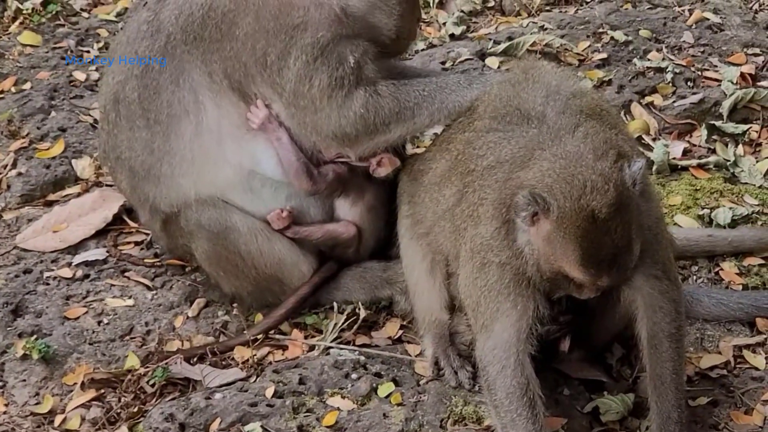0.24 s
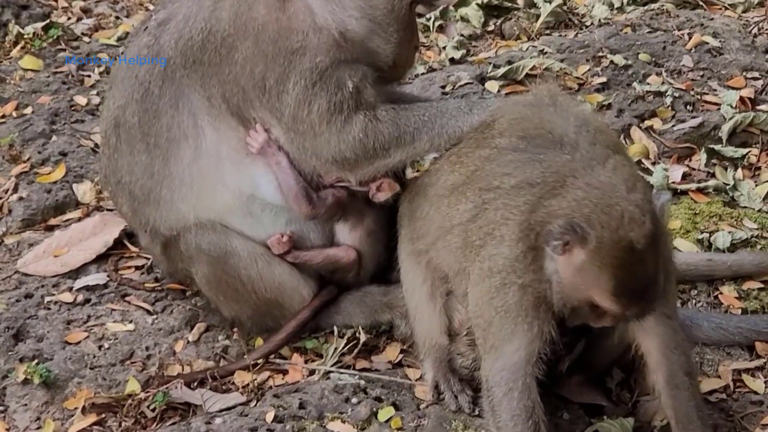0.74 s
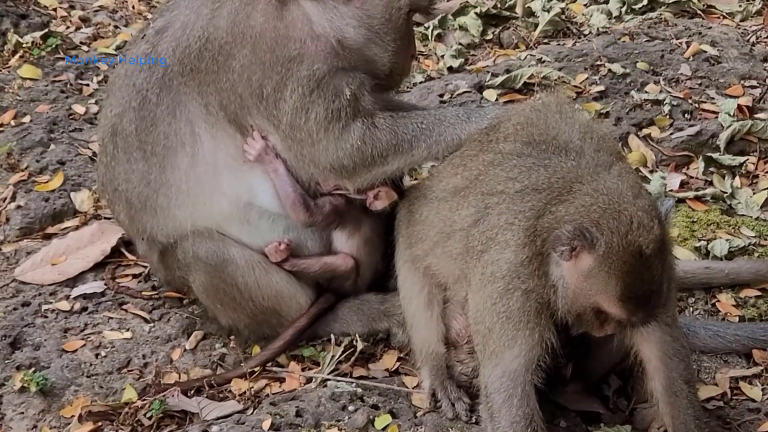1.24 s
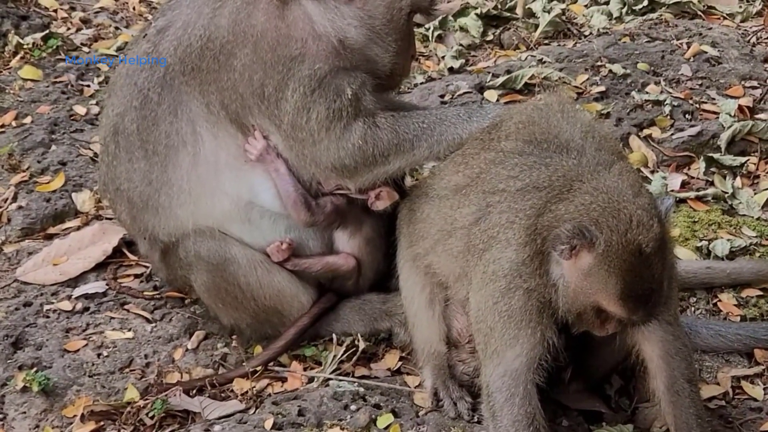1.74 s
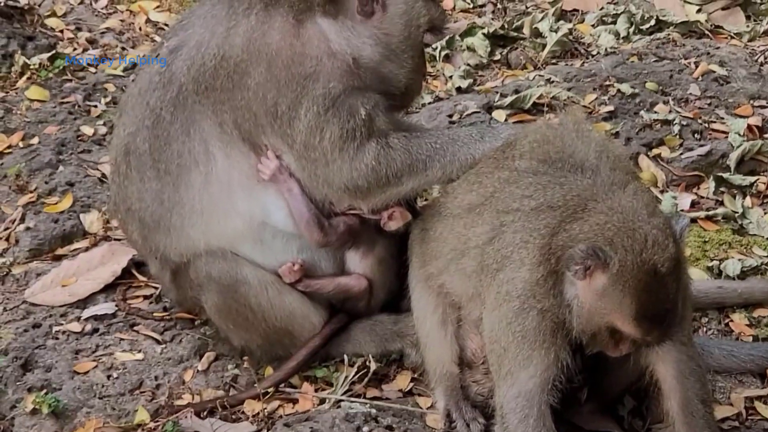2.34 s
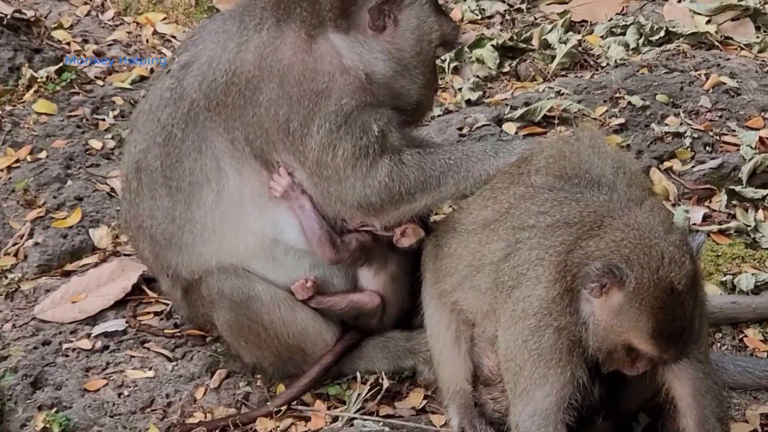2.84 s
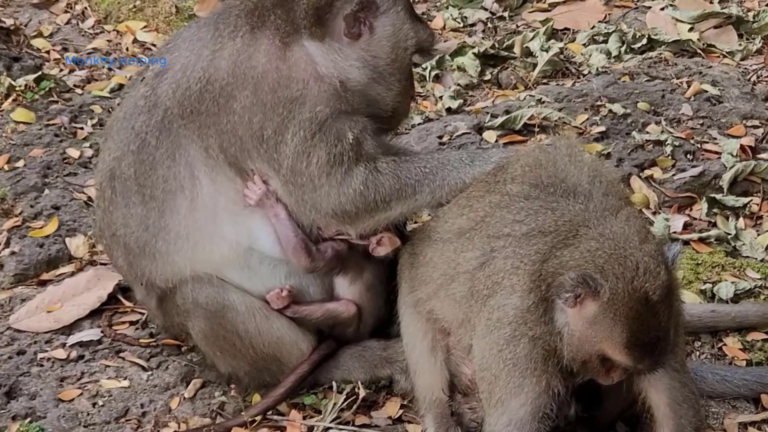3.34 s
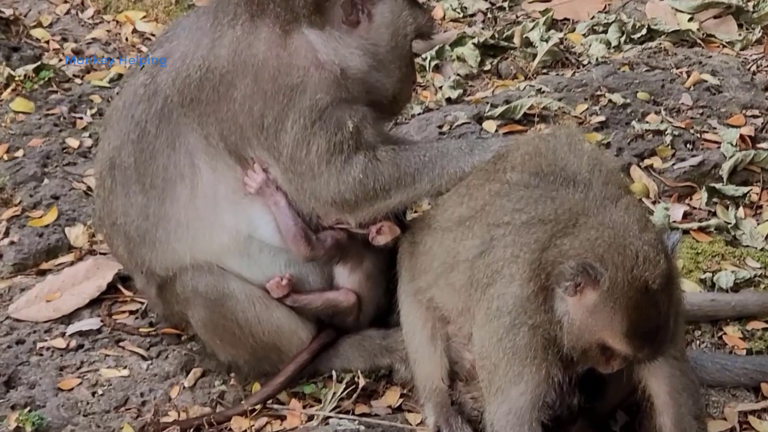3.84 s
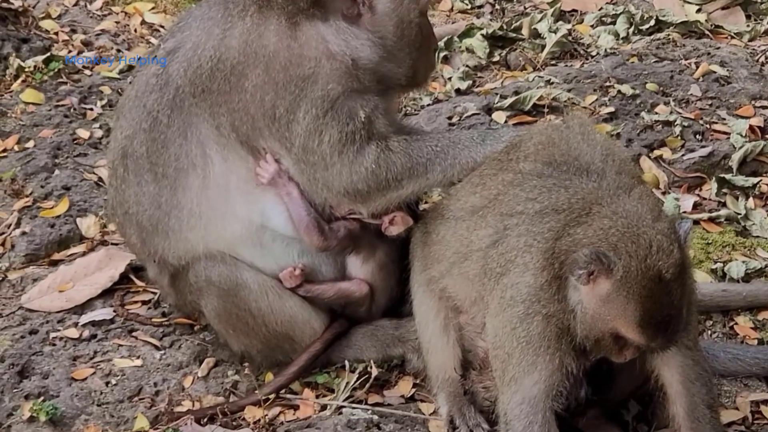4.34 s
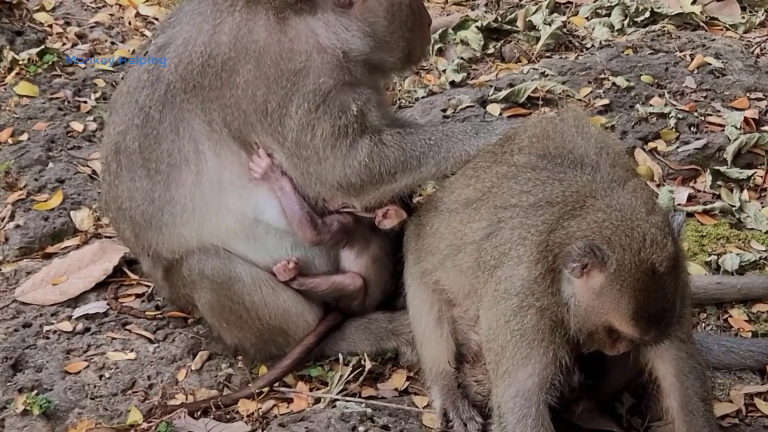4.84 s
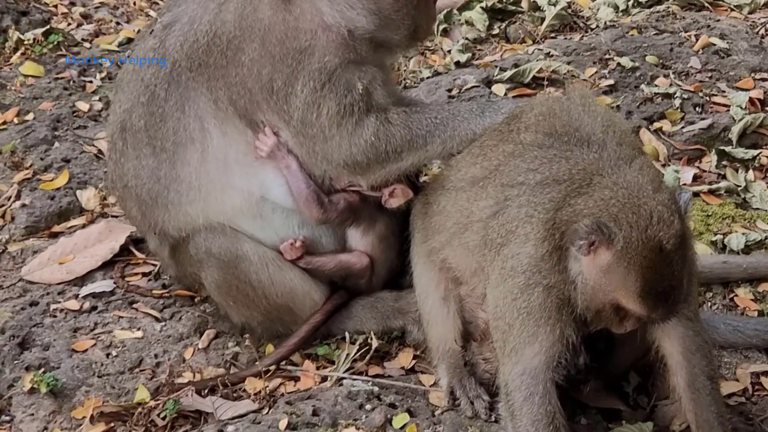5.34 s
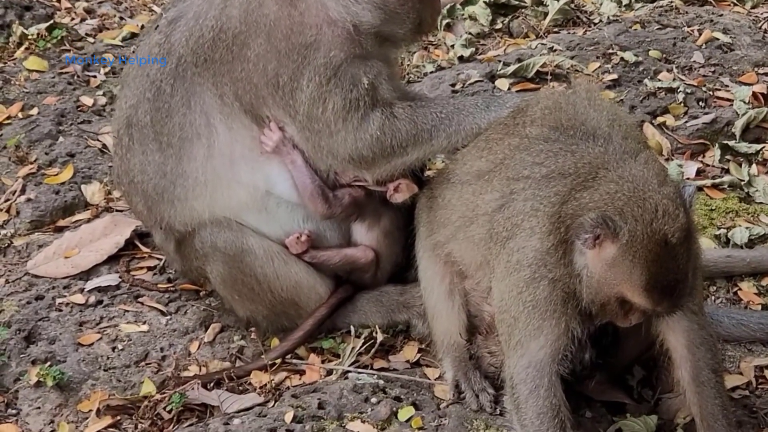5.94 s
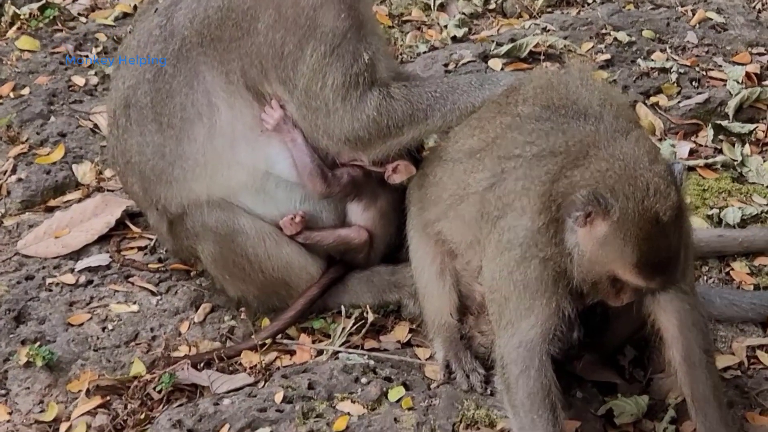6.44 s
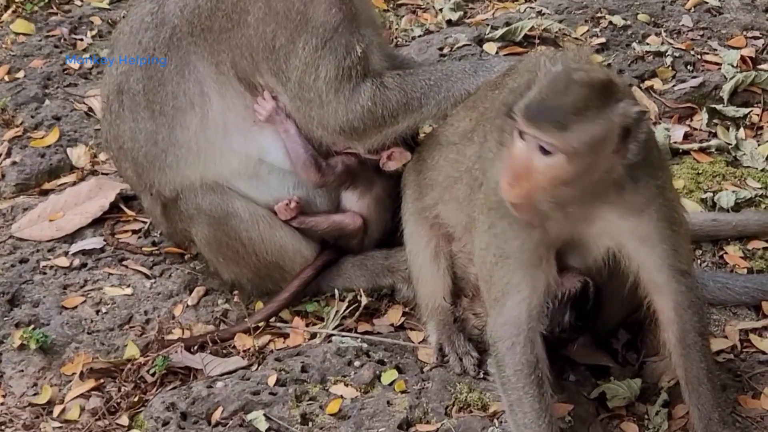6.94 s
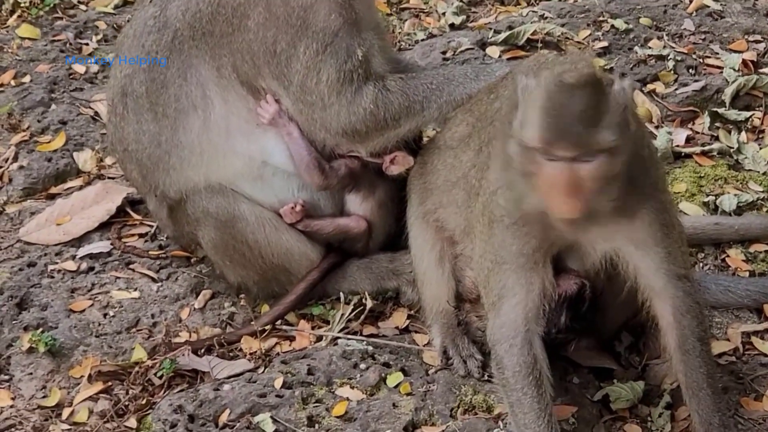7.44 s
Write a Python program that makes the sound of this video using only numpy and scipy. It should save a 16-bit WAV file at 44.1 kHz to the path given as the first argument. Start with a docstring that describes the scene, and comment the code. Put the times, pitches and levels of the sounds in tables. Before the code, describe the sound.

A low engine hum runs unchanged behind a quiet leafy place, with soft wind and hissing insects. One bright twig crack stands out early, after faint bird whistles. Near the middle come barely heard coos and a brief rough shriek from a nearby young monkey, brighter on the right, followed by tiny yelps and a dull paw thud. Later it gives a longer, purer squeal while a bird chirps, another twig snaps, and calm returns.

```python
"""Leaves rustle and a twig snaps over a distant engine's drone, with far traffic, wind and hissing insects.
Birds whistle and chirp, a far monkey coos, paws thud; a young monkey close by on the right shrieks, then squeals.
Calls are stacks of wavering sines mixed with rough breath; whistles, chirps and thuds are single sines.
Leaves, twigs, air and insects are filtered noise; trees scatter calls, snaps and birds back."""
import sys
import numpy as np
from scipy import signal
from scipy.fft import rfft, irfft, next_fast_len
from scipy.io import wavfile
from scipy.ndimage import uniform_filter1d

SR = 44100
rng = np.random.default_rng(int(sys.argv[2]) if len(sys.argv) > 2 else 0)


def materialize(psi):
    """Save the field psi as 16-bit PCM at rate SR to the path in sys.argv[1].

    A 1-D psi becomes a single channel; in a 2-D psi each row is a channel.
    """
    bounded = np.clip(np.atleast_2d(psi).T, -1, 1)
    quanta = np.round(bounded * 32767).astype(np.int16)
    wavfile.write(sys.argv[1], SR, quanta)


N = 339594  # length in samples

# distant engine, the firing tone and weaker tones around it: multiple of its pitch, level/dB
ENGINE_TONES = [(.5, -11.5), (0.749, -19), (1, 2.5), (1.251, -12.5), (1.499, -13), (1.75, -19)]
FIRING_HZ, ENGINE_DB = 69.46, -41.5
ENGINE_WANDER, ENGINE_FLUTTER_DB = .005, 1.3  # spread of pitch (as a share) and of level
# tone colour of far traffic and wind, before the overall level is set: f/Hz, level/dB per Hz
AIR_COLOUR = [(18, -36), (30, -9.5), (45, -8.5), (57, -6.5), (90, -6), (135, -10.5), (199, -21), (315, -24),
              (428, -30), (1790, -46.5), (5380, -41), (6110, -61), (6770, -47), (13500, -57)]
AIR_DB = -39
# how alike the air sounds at left and right: f/Hz, likeness (-1 to 1)
AIR_LIKENESS = [(60, 1), (130, 1), (290, 0.94), (640, 0.29), (1410, -0.61), (3100, -0.15), (6820, 0.12),
                (15000, -0.23)]
# bands of insect hiss: f/Hz, width/Hz, level/dB
INSECT_BANDS = [(6074, 580, -59), (2053, 2290, -54)]
# leaves stirring in short swells: t/s, peak level/dB, half length/s
LEAF_SWELLS = [(0.093, -52, 0.055), (0.183, -48.5, 0.037), (0.624, -54.5, 0.043), (1.493, -50.5, 0.09),
               (3.255, -54, 0.079), (4.727, -57, 0.16), (4.989, -56, 0.083), (6.6, -51.5, 0.06),
               (7.259, -53.5, 0.035), (7.559, -54.5, 0.039), (7.652, -51, 0.022)]
# paw thuds: t/s, starting level/dB, f/Hz
PAW_THUDS = [(0.201, -37.5, 1000), (4.136, -34.5, 460), (4.335, -22, 264), (4.428, -28.5, 460.6),
             (5.23, -31.5, 335)]
# twig snaps: t/s, crack level/dB, centre f/Hz, time to fall 60 dB/s, left minus right level/dB
TWIG_SNAPS = [(0.198, -44, 1800, .05, -2), (1.288, -55, 9100, 0.09, 0), (1.6736, -36, 3500, 0.0053, 2),
              (1.994, -51.5, 7830, .06, -10), (2.3405, -16.5, 7450, 0.093, -2.5),
              (3.031, -50, 6030, 0.18, -5), (3.093, -43.5, 7000, 0.059, -6),
              (3.201, -37.5, 4300, 0.031, -6.5), (3.359, -42, 2900, 0.038, -6),
              (4.801, -49.5, 6000, .07, -8), (5.198, -32, 6620, 0.1, -3), (5.994, -26, 5890, 0.096, -3.5)]
# what rings on after a snap: f/Hz, width/Hz, level/dB
TWIG_RING = [(2560, 740, -4), (6000, 1300, 4), (11050, 810, -2)]
BOUNCE_S, BOUNCE = 0.015, 0.089  # the broken end strikes once more: delay, strength
# far whistles: t/s, length/s, first f/Hz, last f/Hz, bow above the straight glide/Hz, level/dB
BIRD_WHISTLES = [(1.195, .105, 4000, 3400, -24, -63), (1.39, .085, 3600, 4000, -110, -60),
                 (1.55, .11, 3790, 3760, -20, -61.5), (1.69, .09, 3780, 4070, 40, -62),
                 (1.78, .1, 4070, 4040, 0, -67), (1.58, .09, 2040, 1960, 30, -61)]
WHISTLE_EDGE_S = 0.0091
# a bird's quick rising chirps: t/s, first f/Hz, last f/Hz, peak level/dB
BIRD_CHIRPS = [(2.17, 5150, 5510, -52), (5.405, 4900, 5070, -40), (5.51, 4800, 5200, -37),
               (5.604, 4650, 5500, -40.5), (5.68, 4700, 5500, -46.5), (5.721, 4750, 5460, -49)]
# soft coos of a far monkey: t/s, length/s, first f/Hz, last f/Hz, bow/Hz, level/dB before the throat
FAR_COOS = [(3.342, 0.13, 343.5, 430, -25.5, -50), (3.462, 0.15, 339, 365, 27.5, -51.5),
            (3.611, 0.12, 363, 340, 4, -53)]
# lift given by the cooing throat: f/Hz, level/dB
COO_THROAT_LIFT = [(1300, -14), (1800, 2), (2200, -16), (2600, -21), (3100, -5), (3700, -6.5), (4200, -26)]
TREES_DB = -5.5  # energy of the scattered sound against the direct one, for an even noise
MID_T60_S, WIDE_T60_S = 1.2, .26  # time to fall 60 dB: band near 2 kHz, all pitches
# lift given by the young monkey's throat: f/Hz, level/dB
THROAT_LIFT = [(3600, 0.5), (4600, -8), (5600, 9.5), (6800, 8), (7600, 11.5), (8300, -5), (9300, -1),
               (10300, 0.5), (12000, -15), (14000, -13), (15800, -68)]
# tone colour of its breath: f/Hz, level/dB
BREATH_COLOUR = [(1500, -4.5), (2700, -1), (3400, -19), (4300, -1.5), (5000, 3), (6000, -3), (7000, 6),
                 (8500, -8.5), (10000, 5), (12000, -0.5), (14000, -2.5), (15800, -14)]
STRAND_GAP_HZ, STRAND_DRIFT, HISS_DB = 550, .05, -4  # drift as a share of pitch
TOP_HZ = 15900  # nothing is wanted above this
# the calls, left minus right: f/Hz, level/dB
CALL_SHADOW = [(2000, 0), (4400, -1.5), (8000, -8.5), (15000, -4)]
# the hoarse shriek dips, then holds its pitch: t/s, f/Hz, fundamental level/dB, overtones and breath level/dB
SHRIEK_NOTE = [(3.758, 2870, -38, -53), (3.774, 2745, -26.5, -39), (3.796, 2558, -30, -35),
               (3.81, 2700, -25.5, -39), (3.841, 2690, -27.5, -43), (3.85, 2680, -53, -34),
               (3.884, 2700, -48, -40), (3.906, 2750, -26.5, -32.5), (3.931, 2677, -30.5, -50),
               (3.943, 2713, -48, -30), (3.962, 2767, -38.5, -25), (4.02, 2680, -51, -46.5),
               (4.054, 2710, -64, -35), (4.074, 2730, -65, -40)]
SHRIEK_ROUGH_START, SHRIEK_ROUGH_END, TEARS_S = .22, .96, .17  # breath takes over in this time
# a second, thinner tone climbs and falls away inside the shriek: same columns as the shriek
SPLIT_NOTE = [(3.948, 3710, -49, -49), (3.968, 3800, -43, -50), (3.984, 4540, -34.5, -38),
              (4.008, 4630, -40, -42), (4.054, 3450, -45, -56), (4.065, 3520, -56, -53)]
# the long clear squeal: same columns as the shriek
SQUEAL_NOTE = [(5.245, 1895, -47, -46), (5.266, 2107, -41, -38), (5.276, 2110, -35.5, -27),
               (5.293, 2193, -28, -24.5), (5.315, 2230, -36.5, -28.5), (5.361, 2244, -27.5, -25.5),
               (5.415, 2288, -32, -28.5), (5.45, 2345, -56, -25), (5.474, 2414, -30.5, -27),
               (5.512, 2330, -36, -30), (5.528, 2260, -30, -28.5), (5.565, 1936, -39, -31.5),
               (5.591, 1805, -55, -40.5)]
HOARSE, CLEAR, CRACKED = .35, .002, .65  # share of breath at the squeal's start, middle and end
CLEARS_S, CRACKS_S = .06, .05
# short yelps: t/s, hold/s, first f/Hz, last f/Hz, fundamental level/dB,
# overtones and breath level/dB, roughness (0 to 1)
SHORT_YELPS = [(3.664, 0.026, 1956, 2105, -29.5, -31.5, 0.01), (3.7, 0.0075, 2130, 2270, -28.5, -29, 0.04),
               (4.204, 0.034, 2750, 2737, -36, -37.5, 0.85), (4.206, 0.008, 3850, 5500, -39, -40, 0.5),
               (4.204, 0.0044, 4650, 5850, -41, -52, 0.67), (4.328, 0.016, 3740, 3540, -45, -46.5, 0.54),
               (4.374, 0.015, 3860, 3280, -47.5, -49, 0.14), (4.406, 0.016, 2900, 2450, -28.5, -31, 0.87),
               (5.156, 0.02, 1980, 1790, -36.5, -29, 0.09)]
YELP_ATTACK_S, YELP_RELEASE_S, YELP_RISE_DB, YELP_FALL_DB = 0.009, 0.0204, 17.5, 23


def undb(db):
    """Turn decibels into a plain multiplier."""
    return 10 ** (np.asarray(db) / 20)


def level(x, db):
    """Scale a sound to a given average (RMS) level."""
    return x * undb(db) / np.sqrt(np.mean(x ** 2))


def at(table, hz):
    """Value of a (f/Hz, value) table on a log-frequency axis."""
    f, v = np.transpose(table)
    return np.interp(np.log(np.maximum(hz, 1)), np.log(f), v)


def colour(x, gain):
    """Filter by a gain that is a function of frequency."""
    size = next_fast_len(x.shape[-1])
    hz = np.arange(size // 2 + 1) * SR / size
    return irfft(rfft(x, size) * gain(hz), size)[..., :x.shape[-1]]


def peak(hz, width):
    """Gain of a resonance applied twice, halved at the edges of its width."""
    return lambda f: 1 / (1 + ((f - hz) / (width / 2)) ** 2)


def walk(rate, size=N):
    """Smooth random wander: levels held 1 / rate s and slewed twice; spread near 1."""
    k = int(SR / rate)
    steps = np.repeat(rng.standard_normal(size // k + 1), k)
    return 1.341 * uniform_filter1d(uniform_filter1d(steps, k), k)[:size]


def turns(hz):
    """Running phase of a tone whose pitch may change."""
    return 2 * np.pi * np.cumsum(hz) / SR


def note(table, edge_s):
    """First sample, times, columns and soft-edged gate of one note."""
    s, *columns = np.transpose(table)
    first = int(s[0] * SR)
    t = np.arange(first, int(s[-1] * SR)) / SR
    gate = np.clip(np.minimum(t - s[0], s[-1] - t) / edge_s, 0, 1)
    return first, t, [np.interp(t, s, c) for c in columns], gate


def bowed_note(s, length, first_hz, last_hz, bow, edge_s):
    """First sample, size, pitch and gate of a glide that bends away from a straight line."""
    first, t, (along,), gate = note([(s, 0), (s + length, 1)], edge_s)
    hz = first_hz + (last_hz - first_hz) * along + bow * np.sin(np.pi * along)
    return first, len(t), hz, gate


def drone():
    """The engine's firing tone, with weaker tones from its uneven cylinders."""
    phase = turns(FIRING_HZ * (1 + ENGINE_WANDER * walk(1.993)))
    tones = sum(undb(db + ENGINE_FLUTTER_DB * walk(11)) * np.sin(order * phase) for order, db in ENGINE_TONES)
    return undb(ENGINE_DB) * np.sqrt(2) * tones


def air():
    """Far traffic and wind: octave bands of noise that swell together; all but the lowest flicker alone."""
    like = lambda f: np.clip(at(AIR_LIKENESS, f), -.99, .999)
    mid, side = rng.standard_normal((2, N))
    mid = colour(mid, lambda f: np.sqrt(1 + like(f)))
    side = colour(side, lambda f: np.sqrt(1 - like(f)))
    tone = lambda f: undb(at(AIR_COLOUR, f) - 10 * np.log10(1 + like(f))) / (1 + (f / 13200) ** 16)
    both = colour(np.array([mid + side, mid - side]), tone)
    out, swell = 0, walk(1.0)
    for octave in range(10):
        share = lambda f: np.clip(1 - np.abs(np.log2(np.maximum(f, 25) / 25) - octave), 0, 1)
        flicker = min(octave / 3, 1) * 1.84 * walk(4.6)
        out = out + undb(.5 * swell + flicker) * colour(both, share)
    return level(out, AIR_DB)


def insects():
    """Distant chorus: bands of noise whose level wavers slowly."""
    out = np.zeros((2, N))
    for hz, width, db in INSECT_BANDS:
        band = level(colour(rng.standard_normal((2, N)), peak(hz, width)), db)
        out += band * undb(2.05 * walk(1.61))
    return out


def leaves():
    """Dense tiny crackles over a broad treble, heard in swells."""
    grains = rng.standard_normal((2, N)) * undb(2.9 * rng.exponential(size=(2, N)))
    rustle = level(colour(grains, lambda f: peak(7000, 11000)(f) / (1 + (f / 13500) ** 16)), 0)
    t = np.arange(N) / SR
    swells = sum(undb(db) * np.exp(-((t - s) / half) ** 2) for s, db, half in LEAF_SWELLS)
    return rustle * swells * undb(2.1 * walk(40))


def thuds():
    """Soft blows of paws on the ground: a dull ring that dies within milliseconds."""
    out, t = np.zeros(N), np.arange(SR // 8) / SR
    for s, db, hz in PAW_THUDS:
        first = int(s * SR)
        out[first:first + len(t)] += undb(db) * np.exp(-t / 0.0033) * np.sin(2 * np.pi * hz * t)
    return out


def snaps():
    """A noise swells in over a few milliseconds, cracks, then rings and dies away."""
    out, lead = np.zeros((2, N)), SR // 50
    t = np.arange(-lead, SR // 3) / SR
    after = np.maximum(t, 0)
    for s, db, hz, t60, pan_db in TWIG_SNAPS:
        noise = rng.standard_normal((2, len(t)))
        crack = np.exp(-(after / 0.005) ** 2)
        fading = 0.22 * undb(-60 * after / max(t60, .005) + 2.5 * walk(106, len(t)))
        bounce = BOUNCE * np.exp(-((t - BOUNCE_S) / 0.0027) ** 2)
        swell_in = 0.17 * np.exp(t / 0.0097)
        shape = np.where(t < 0, swell_in, crack + fading + bounce)
        burst = colour(noise * shape, lambda f: peak(hz, 2 * hz)(f) * f ** 2 / (f ** 2 + 1500 ** 2))
        ring = colour(noise, lambda f: sum(undb(d) * peak(c, w)(f) for c, w, d in TWIG_RING))
        burst += .5 * ring * (t > 0) * undb(-60 * after / max(1.65 * t60, .005))
        # the crack level is that of the first 4 ms
        sides = undb(db + np.array([[pan_db], [-pan_db]]) / 2)
        burst *= sides / burst[:, lead:lead + SR // 250].std()
        first = int(s * SR) - lead
        out[:, first:first + len(t)] += burst
    return out


def whistles():
    """Far birds: thin fluttering sines on bowed glides."""
    out = np.zeros((2, N))
    for *glide, db in BIRD_WHISTLES:
        first, size, hz, gate = bowed_note(*glide, WHISTLE_EDGE_S)
        phase = turns(hz * (1 + 0.007 * walk(52.0, size)))
        for ear in range(2):
            flutter = undb(db + 4.6 * walk(45, size))
            out[ear, first:first + size] += gate * np.sqrt(2) * flutter * np.sin(phase + ear)
    return out


def chirps():
    """A bird's short upward sweeps of one sine, with soft ends."""
    out, t = np.zeros(N), np.arange(SR // 28) / SR
    for s, first_hz, last_hz, db in BIRD_CHIRPS:
        phase = turns(np.linspace(first_hz, last_hz, len(t)))
        first = int(s * SR)
        out[first:first + len(t)] += undb(db) * np.hanning(len(t)) * np.sin(phase)
    return out


def coos():
    """Low gliding voice of which only the partials lifted by the throat carry this far."""
    out = np.zeros((2, N))
    for *glide, db in FAR_COOS:
        first, size, hz, gate = bowed_note(*glide, 0.037)
        phase = turns(hz * (1 + 0.006 * walk(69, size)))
        for ear in range(2):
            for k in range(4, 12):
                loud = undb(db + at(COO_THROAT_LIFT, k * hz) + 3.2 * walk(49, size))
                out[ear, first:first + size] += gate * np.sqrt(2) * loud * np.sin(k * phase + ear * k)
    return out


def trees(x):
    """Trunks and ground scatter the sound back; a band near 2 kHz lingers after the treble has died."""
    t = np.arange(SR) / SR
    lingering = 0.42 * colour(rng.standard_normal((2, SR)), peak(2180, 1540)) * undb(-60 * t / MID_T60_S)
    wide = 1.38 * rng.standard_normal((2, SR)) * undb(-60 * t / WIDE_T60_S)
    tail = (wide + lingering) * np.clip(t / 0.0015, 0, 1)
    return signal.fftconvolve(x, level(tail, TREES_DB) / np.sqrt(SR), axes=1)[:, :N]


def rasp(size):
    """The torn voice: short broken strands that slide about, over hiss; the whole jet stutters."""
    hiss = level(colour(rng.standard_normal((2, size)), lambda f: undb(at(BREATH_COLOUR, f))), HISS_DB)
    strands = np.zeros((2, size))
    for centre in np.arange(2000, TOP_HZ - 1000, STRAND_GAP_HZ):
        hz = centre + STRAND_GAP_HZ * rng.standard_normal() / 2
        hz = hz * (1 + STRAND_DRIFT * walk(45, size) + 0.0121 * walk(500, size))
        phase = turns(hz) + rng.uniform(0, 2 * np.pi, (2, 1))
        fits = np.array([np.minimum(8.0 * walk(88.8, size), 6.0) for ear in range(2)])
        strands += undb(at(BREATH_COLOUR, hz) + fits) * np.sin(phase)
    stutter = undb(np.minimum(3.1 * walk(180.4, size), 4.0))
    return level((hiss + level(strands, 0)) * stutter, 0)


def voice(table, rough_curve):
    """One note: wavering partials through the throat, drowned in breath where it turns rough."""
    out = np.zeros((2, N))
    first, t, (hz, low_db, high_db), gate = note(table, .0025)
    rough, size = np.interp(t, *np.transpose(rough_curve)), len(t)
    wobble = .012 * rough * walk(70, size)
    jitter = (0.0046 + 0.014 * rough) * walk(400, size)
    phase = turns(hz * (1 + jitter + wobble))
    weight = np.array([undb(at(THROAT_LIFT, k * hz)) * (k * hz < TOP_HZ) for k in range(2, 9)])
    weight /= np.sqrt(np.sum(weight ** 2, axis=0))
    # strong and weak cycles alternate in fits: broken strands half-way between the partials
    half = np.array([undb(at(BREATH_COLOUR, (k + .5) * hz) + 7.0 * walk(51.5, size)) * ((k + .5) * hz < TOP_HZ)
                     for k in range(1, 6)])
    half *= 0.23 * rough * np.sin(np.arange(1.5, 6)[:, None] * phase)
    throb = undb(2.0 * rough * walk(131.0, size))  # the folds close unevenly
    breath = rasp(size)
    for ear in range(2):
        # bounces off ground and bodies make every partial flutter by itself in each ear
        part = []
        for k in range(1, 9):
            flutter = undb(np.minimum(3.4 * walk(104.7, size) + 21.6 * rough * walk(350, size), 4.5))
            shift = ear * (1.01 * k + 0.43 * walk(6.4, size))
            part.append(np.sqrt(2) * flutter * np.sin(k * phase + shift))
        overtones = np.sqrt(1 - rough) * np.sum(weight * part[1:], axis=0)
        high = overtones + half.sum(axis=0) + np.sqrt(rough) * breath[ear]
        out[ear, first:first + size] = gate * (undb(low_db) * throb * part[0] + undb(high_db) * high)
    return out


def yelp(s, hold, first_hz, last_hz, low_db, high_db):
    """Note table of a yelp: attack, hold and release over a straight glide."""
    times = s + np.cumsum([0, YELP_ATTACK_S, max(hold, .001), YELP_RELEASE_S])
    shape = np.array([-YELP_RISE_DB, 0, 0, -YELP_FALL_DB])
    hz = np.interp(times, times[[0, -1]], [first_hz, last_hz])
    return np.transpose([times, hz, low_db + shape, high_db + shape])


def squeals():
    """All the young monkey's notes; the recorder's body shades the left side from their treble."""
    start, tear_start, end = SQUEAL_NOTE[0][0], SHRIEK_NOTE[0][0], SQUEAL_NOTE[-1][0]
    clearing = [(start, HOARSE), (start + CLEARS_S, CLEAR), (end - CRACKS_S, CLEAR), (end, CRACKED)]
    tearing = [(tear_start, SHRIEK_ROUGH_START), (tear_start + TEARS_S, SHRIEK_ROUGH_END)]
    out = voice(SQUEAL_NOTE, clearing) + voice(SHRIEK_NOTE, tearing) + voice(SPLIT_NOTE, [(0, .1)])
    for *row, rough in SHORT_YELPS:
        out = out + voice(yelp(*row), [(0, np.clip(rough, 0, 1))])
    return colour(out, lambda f: undb(np.outer([.5, -.5], at(CALL_SHADOW, f))))


def scene():
    """Calls, snaps and birds ring among the trees; the other layers are added without that ring."""
    ringing = squeals() + snaps() + whistles() + coos() + chirps()
    return ringing + trees(ringing) + thuds() + leaves() + air() + drone() + insects()


def record(dry):
    """Slightly unlike capsules; the recorder cuts the deepest bass and the top."""
    # in the bass the left capsule is 0.7 dB louder and 0.45 ms late
    gain = lambda f: undb(0.7 / (1 + (f / 400) ** 2))
    lag = lambda f: np.exp(-2j * np.pi * f * 0.00045 / (1 + (f / 300) ** 2))
    left = colour(dry[0], lambda f: gain(f) * lag(f))
    both = signal.sosfilt(signal.butter(4, 28, "high", fs=SR, output="sos"), [left, dry[1]])
    return signal.sosfilt(signal.ellip(10, .2, 80, TOP_HZ, fs=SR, output="sos"), both)


dry = scene()
out = record(dry)
materialize(out)
```